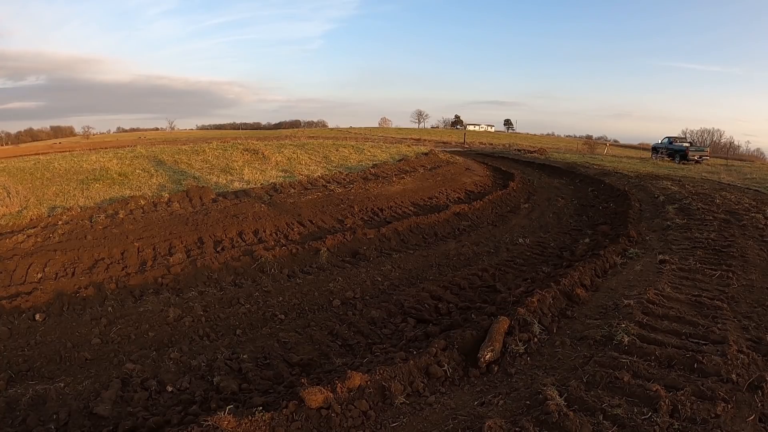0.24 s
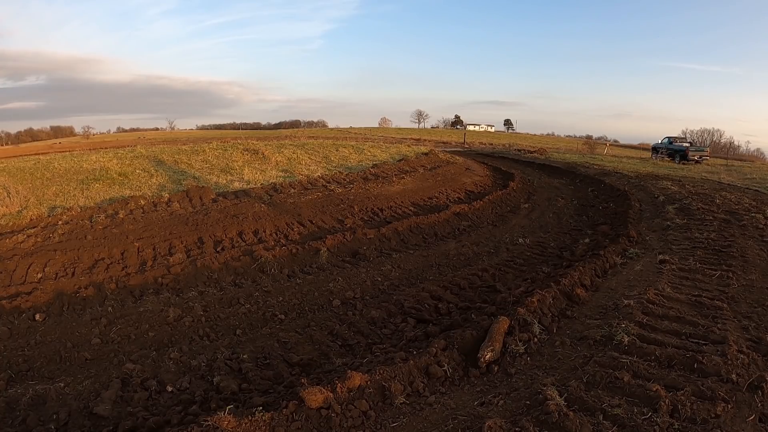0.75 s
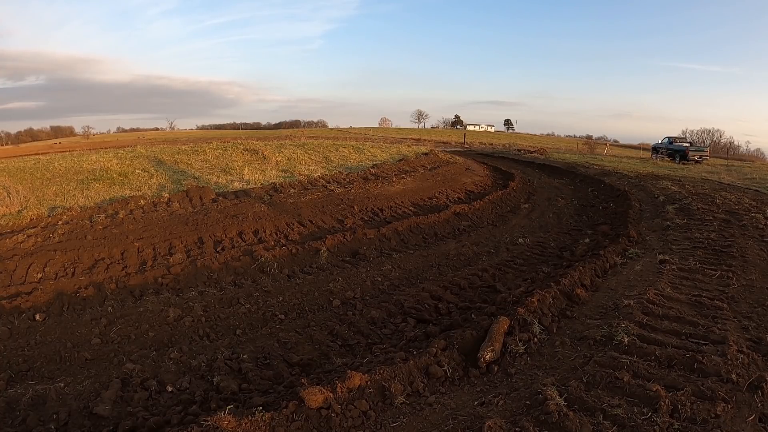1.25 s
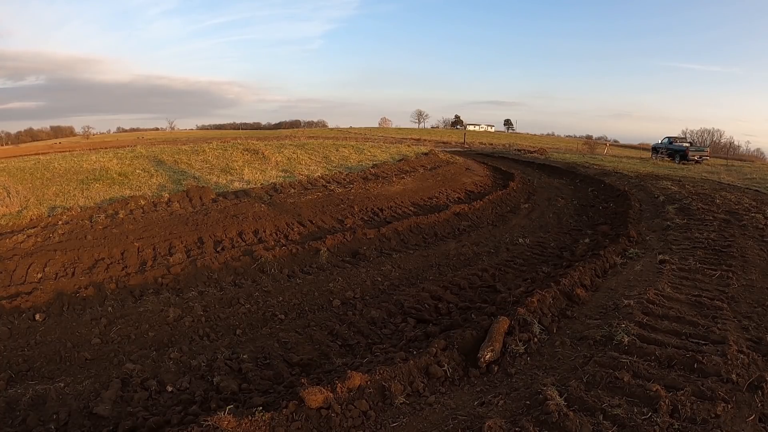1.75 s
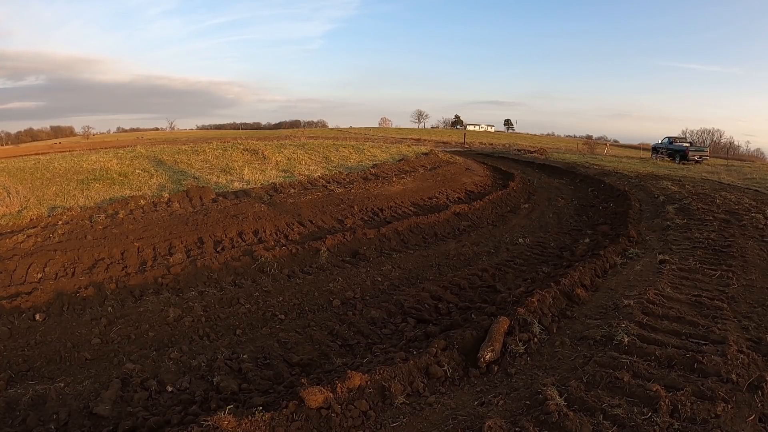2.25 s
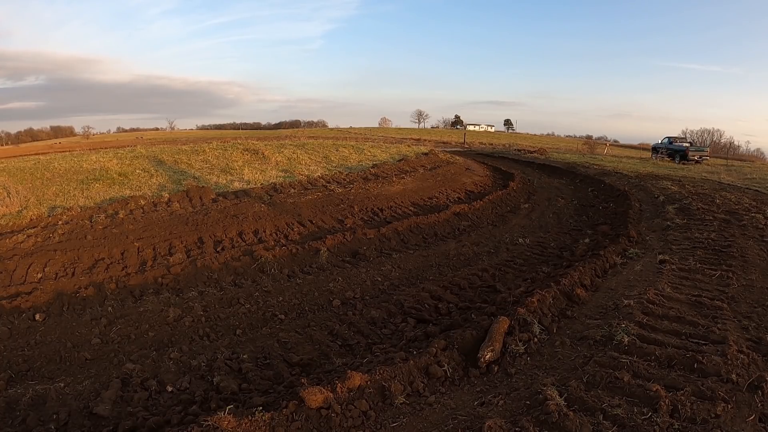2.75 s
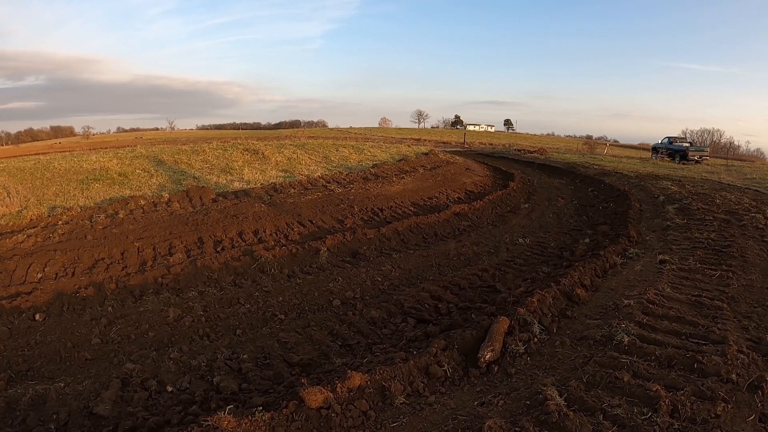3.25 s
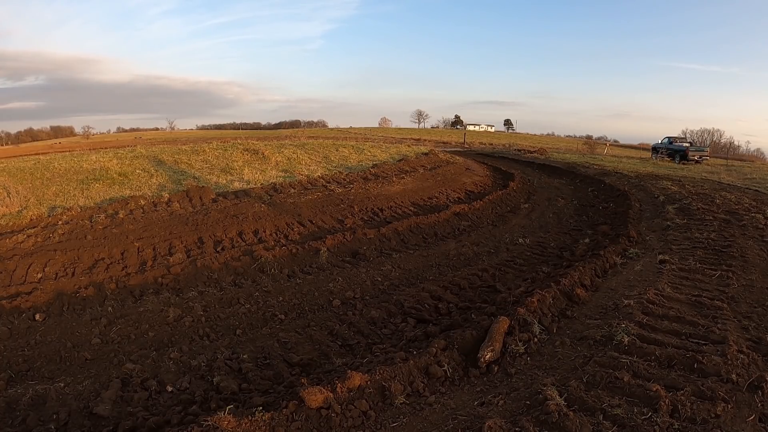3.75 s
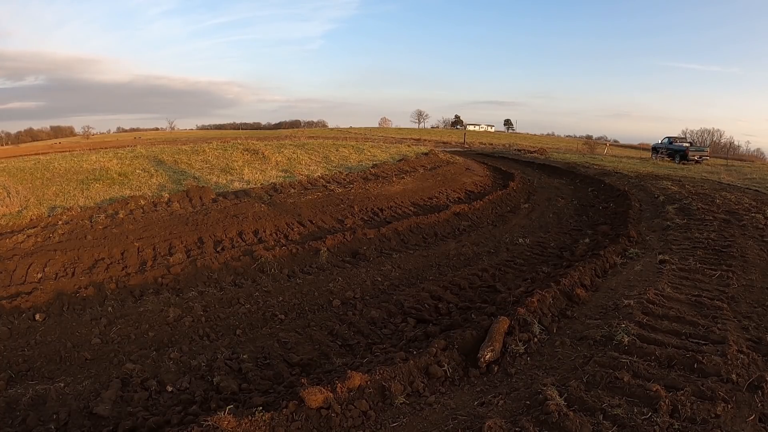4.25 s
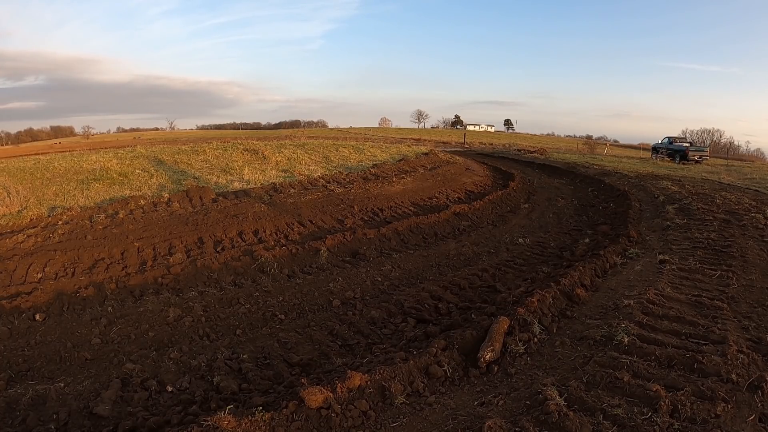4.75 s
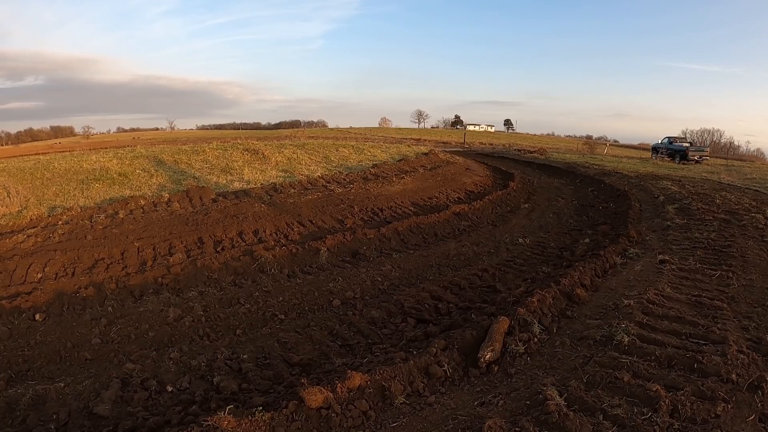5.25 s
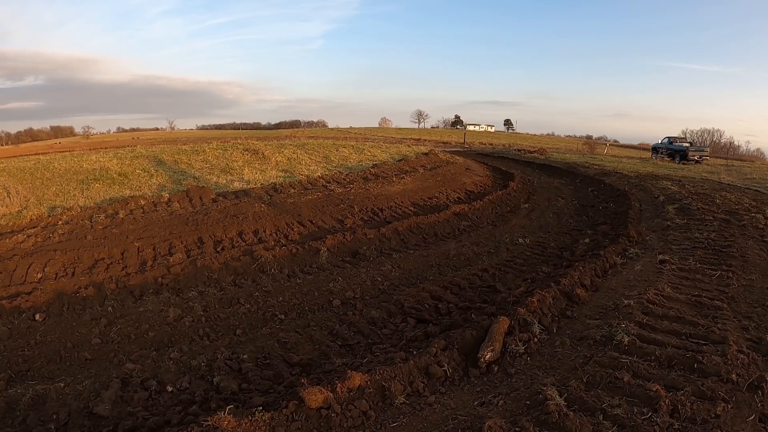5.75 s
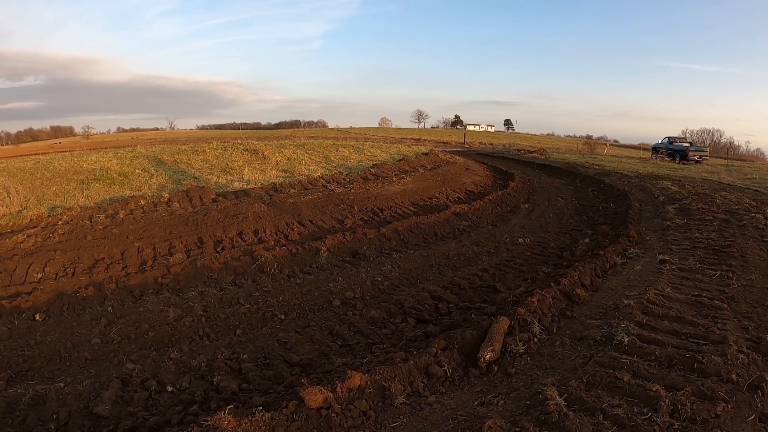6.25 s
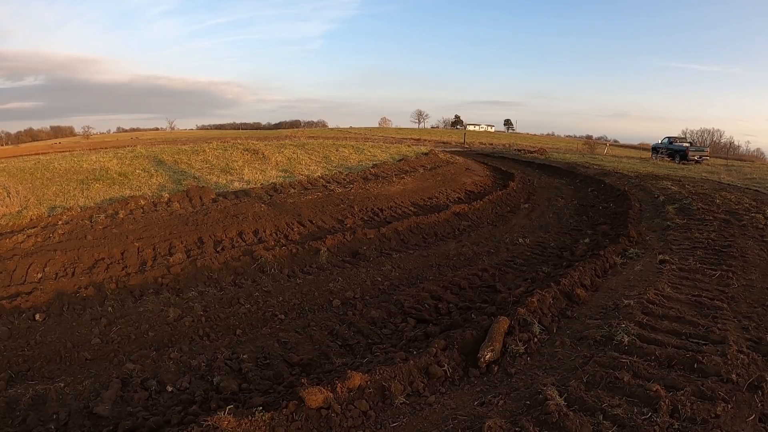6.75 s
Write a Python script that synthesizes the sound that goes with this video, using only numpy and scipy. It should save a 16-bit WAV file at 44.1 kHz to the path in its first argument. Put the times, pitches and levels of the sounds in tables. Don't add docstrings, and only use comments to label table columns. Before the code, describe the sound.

From 0 to 2.2 seconds a diesel crawler runs at steady working speed: a firm low exhaust drone, breathy fan and intake roar, a wavering gear whine, soil rumble, and constant link rattle with irregular steel plate clanks. A tiny high pin squeak passes at the start and faint ones near 1 second. At about 2.25 the throttle shuts; the note drops sharply in level and slides down by more than an octave until 3.3, clanks thinning to a few loose knocks. At 3.4 the engine bursts back and climbs through 4.2, dipping slightly, with almost no plate hits. From 4.2 clanks return, the whine rises, and from 5 to 7 the track clatter is denser, nearer and harder, with a brief squeak near 6.2. Open-air, dry stereo; highs favour the left, lows are shared. It ends still driving.

```python
import sys
import numpy as np
from scipy import signal
from scipy.fft import rfft, irfft, next_fast_len
from scipy.io import wavfile
from scipy.ndimage import uniform_filter1d

SR = 44100
rng = np.random.default_rng(int(sys.argv[2]) if len(sys.argv) > 2 else 0)


def master(y):
    cut = np.clip(np.atleast_2d(y).T, -1, 1)
    pcm = np.round(cut * 32767)
    wavfile.write(sys.argv[1], SR, pcm.astype(np.int16))


def level_to_linear(level):
    exponent = np.asarray(level, float) / 20
    return 10 ** exponent


N = 309141
SIZE = next_fast_len(N + 4096)
HZ = np.fft.rfftfreq(SIZE, 1 / SR)

# start_s, firing_hz, note_db
ENGINE = [(0.0, 110, -15.5), (0.85, 111.5, -17.5), (1.15, 108.3, -16), (1.6, 111.3, -18),
          (2.25, 107.5, -18), (2.275, 107.6, -29.5), (2.55, 83.35, -28.5), (2.75, 72.25, -27.5),
          (3.17, 50, -33), (3.33, 47.1, -31), (3.4, 54.6, -19), (3.5, 68.52, -16.5), (3.8, 84.15, -16.5),
          (4.18, 100.2, -16), (4.35, 97.5, -19.5), (5.1, 105.6, -18), (6.2, 110, -17.5),
          (7.01, 109.6, -18.5)]
# multiple_of_firing_rate, level_db
CRANK_ORDERS = [(.5, -28), (2 / 3, -34), (4 / 3, -26), (1.5, -25)]
# pitch_hz, level_against_note_db
STACK = [(96, 11), (112, -1.5), (135, -6), (148, -13), (166, -1.5), (182, -25), (205, -21), (222, -13)]
# start_s, gear_mesh_hz, track_work_db, nearness_db, intake_draw_db
TRAVEL = [(0, 968, -1, 4, 10), (.5, 998, -0.5, 1, 10), (1.1, 974, -1, 0, 4), (1.6, 1000, 0, -0.5, -8),
          (2.2, 1004, -1, -1.5, -6), (2.55, 900, -4, 0.5, -8), (3.3, 796, -6, 0.5, -28),
          (3.42, 798.4, -12, 3, 6), (3.55, 808.4, -8.5, -4, 3), (3.75, 831, -9.5, -0.5, 2),
          (4.2, 901, -4.5, 0.5, 3), (4.65, 1003, -1, -0.5, -15.5), (5.2, 1051, 0, 2, -10),
          (6.2, 1075, 0, 4, -1.5), (7.01, 1101, 0.5, 3.5, -6.5)]
# pitch_hz, level_db
ROAR = [(200, -15.5), (300, 4.5), (420, -4.5), (590, -6), (800, -4), (1250, -0.5), (1700, -12.5),
        (2500, -11.5), (3600, -12), (5000, -19.5), (6500, -22.5), (8000, -38), (10300, -53), (13000, -50.5)]
# start_s, peak_db, body_db, edge_db
PLATES_STOPPING = [(.066, -17.5, -7.5, -3), (.104, -20.5, -10, 1.5), (.209, -26, 0.5, -21),
                   (.249, -12.5, -17, -10.5), (.434, -22.5, 3, -33), (.546, -22.5, 1, -6.5),
                   (.632, -22, 1.5, -21), (.693, -18, -5.5, -19), (.719, -15.5, -10.5, -5.5),
                   (.741, -17.5, -4.5, -14), (.846, -23, 3.5, -5.5), (.902, -20.5, 2.2, -20.5),
                   (.956, -22, -1.5, -17), (1.009, -23.5, -4.5, -24), (1.13, -17.5, -10, -8.5),
                   (1.179, -24, 0.5, 0.5), (1.544, -28.5, 7, -11), (1.61, -22, 3, 0),
                   (1.725, -23.5, 2, -26), (1.772, -21.5, -1.5, -2), (1.86, -24.5, -5.5, -31),
                   (1.969, -27.5, 2.5, -22), (2.033, -31.5, 1.5, -20.5), (2.079, -21, -0.3, -26),
                   (2.311, -25, 5, -15), (2.346, -20, -4.5, -1.5), (2.42, -18.5, -3.5, -30),
                   (2.456, -20, -0.5, -9), (2.597, -14, -8, -19), (2.722, -19, 3, -8)]
# start_s, peak_db, body_db, edge_db
PLATES_AWAY = [(3.039, -26.5, 3.5, -16), (3.177, -27.5, 0, -27), (3.252, -23, -2.5, -27),
               (3.306, -19, -15.5, -12.5), (3.349, -29, -1, -15), (4.167, -19.5, -2.8, -22.5),
               (4.298, -20.5, -1.5, -16), (4.4, -19.5, 1, -29), (4.537, -19, -1.1, -14),
               (4.633, -18.5, 0, -11), (4.753, -16.5, -5.5, 1), (4.859, -17.5, -1.5, 3.5),
               (4.963, -20.5, 6.5, -32), (5.096, -15.5, -3, -4), (5.177, -13.5, -8, -3),
               (5.29, -29.5, -2.3, -23), (5.389, -13.5, -8.5, -6), (5.494, -12.5, -8, -8),
               (5.583, -27, 1.5, -20), (5.606, -25.5, 9, -12), (5.702, -18.5, 0, -16),
               (5.921, -17.5, -4, -18), (6.014, -13.5, -6, -0.5), (6.325, -26, -3.8, -22),
               (6.546, -18.5, -2.7, -33.5), (6.643, -12.5, -7.5, -14), (6.748, -13, -6, -19),
               (6.821, -21, -3, -15), (6.843, -13, -5.5, -10), (6.937, -13, -4, -13)]
# start_s, peak_db
PLATES_FAR = [(.013, -32), (.038, -28.5), (.181, -29), (.289, -26.5), (.328, -24.5), (.504, -30),
              (.523, -25.5), (1.075, -24.5), (1.148, -31.5), (1.3, -24.5), (1.408, -31), (1.524, -31),
              (1.628, -23.5), (1.659, -32.5), (2.183, -26.5), (2.848, -29), (2.885, -28.5), (4.5, -23),
              (5.022, -30.5), (5.27, -26.5), (5.477, -28), (5.81, -25), (6.04, -19.5), (6.137, -21),
              (6.23, -23), (6.359, -33), (6.446, -25.5), (6.626, -23.5)]
# pitch_hz, width_hz, level_db
TRACK_FRAME = [(587, 43, -6), (942, 79, 2.5), (1157, 280, 3), (2150, 170, -21.5), (3240, 620, -4.5),
               (590, 500, 5)]
# start_s, pitch_hz, level_db, width_s, glide_fraction
SQUEAKS = [
    (.047, 6090, -31, .009, 0),
    (1.005, 9940, -66, .018, -.004),
    (1.028, 9900, -56, .005, 0),
    (6.187, 9000, -50, .012, -.01),
]
# pitch_hz, level_db
SOIL = [(12, -53), (20, -15), (65, -5.5), (92, -3.5), (161, 2), (190, -9.5), (235, -9), (265, -19),
        (296, -12.5), (500, -46.5), (650, -65.5), (1100, -120)]
# pitch_hz, level_db
DISTANCE = [(250, -5.5), (420, -3.5), (560, -0.5), (4000, -8.5), (5000, -13.5), (6500, -15), (7200, -30.5),
            (8200, -28), (9500, -50), (10500, -45.5), (12500, -46), (14000, -55)]
# pitch_hz, level_db, phase_rad
SHADE = [(30, 0, -.03), (110, -.3, -.07), (300, -3, -.25), (600, -13, -.15), (730, -28, .5), (830, -17, 2),
         (1000, -23, 0), (1300, -24, 1), (1600, -36, 1), (1800, -18, 1.6), (2250, -35, 1.5),
         (2700, -12, 2.3), (3250, -15, 1.6), (3550, -32, 0), (4300, -8, -2.1), (5800, -13, -2.2),
         (8000, -6, -3.1), (9500, -8, -3.3), (12000, -1, -6)]
# pitch_hz, level_db
SCATTER = [(35, -9), (60, -36), (300, -34), (450, -17), (700, -23), (2000, -24), (4000, -19), (6500, -13),
           (9000, -2)]

GOVERNED_HZ = 110
STOPPING_RING_HZ, AWAY_RING_HZ = 1780, 2120


def unit(x):
    return x / np.sqrt(np.mean(x ** 2))


def curves(table):
    start_s, *columns = np.transpose(table)
    return [np.interp(np.arange(N) / SR, start_s, c) for c in columns]


def over_hz(table, axis=1):
    table = np.array(table)
    return np.interp(np.log(HZ + 1), np.log(table[:, 0]), table[:, axis])


def colour(x, gain):
    mirrored = np.pad(x, 2048, mode="reflect", reflect_type="odd")
    return irfft(rfft(mirrored, SIZE) * gain, SIZE)[2048:][:N]


def ring(x, hz, width_hz):
    return signal.lfilter(*signal.iirpeak(hz, hz / width_hz, SR), x)


def body(x, modes):
    return unit(sum(level_to_linear(db) * unit(ring(x, hz, width)) for hz, width, db in modes))


def walk(rate):
    hold = int(SR / rate)
    steps = np.repeat(rng.standard_normal(N // hold + 1), hold)
    return unit(uniform_filter1d(uniform_filter1d(steps, hold), hold)[:N])


def narrow(hz, width_hz):
    turn = 2 * np.pi * np.cumsum(hz + np.zeros(N)) / SR
    return unit(walk(width_hz) * np.cos(turn) + walk(width_hz) * np.sin(turn))


def exhaust(hz, note_db, second_db):
    turn = 2 * np.pi * np.cumsum(hz * (1 + 0.0061 * walk(30))) / SR
    note = level_to_linear(note_db + 0.16 * walk(30) + 0.33 * walk(90)) * np.sin(turn)
    smear = np.interp(note_db, [-26, -20], [2.5, .6])
    second = level_to_linear(second_db - 2.5 + walk(25)) * np.cos(2 * turn + smear * walk(13))
    crank = 0
    for multiple, db in CRANK_ORDERS:
        level = level_to_linear(db + note_db + 3.7 * walk(6.7))
        crank = crank + level * np.sin(multiple * turn + 1.5 * walk(6))
    return np.sqrt(2) * (note + second + crank), turn


def roar(turn, roar_db, low_db, high_db):
    air = rng.standard_normal(N) * (1 + 0.1 * np.sin(turn))
    wide = unit(colour(air, level_to_linear(over_hz(ROAR)))) * level_to_linear(roar_db + 3.5 + 0.94 * walk(13))
    low_whistle = level_to_linear(low_db) * narrow(2850 + 40 * walk(3.5), 360)
    high_whistle = level_to_linear(high_db) * narrow(4720 + 30 * walk(3.9), 480)
    return wide + low_whistle + high_whistle


def gears(hz, db):
    hz = hz * (1 + .006 * walk(10))
    tone = np.sin(2 * np.pi * np.cumsum(hz) / SR)
    smear = .8 * narrow(hz, 60)
    octave = level_to_linear(-11) * narrow(2 * hz, 90)
    return level_to_linear(db - 5 + 2 * walk(16)) * (tone + smear + octave)


def plate(ring_hz, body_db, edge_db, work_db):
    t = np.arange(4096) / SR
    noise, vary = rng.standard_normal((3, 4096)), rng.standard_normal(7)
    length_s = 0.013 * level_to_linear(-work_db + 1.2 * vary[6])
    fall = np.exp(-(t / np.clip(length_s, .003, .04)) ** 1.6) + .15 * np.exp(-t / .035)
    blow = noise * np.minimum(t / 0.0011, 1) * fall
    frame = ring(blow[0], 1000 * (1 + 0.072 * vary[0]), 220)
    frame += ring(blow[0], 1400 * (1 + 0.037 * vary[1]), 140)
    frame += 0.13 * ring(blow[0], 350, 248.6)
    own = ring(blow[1], ring_hz * (1 + 0.035 * vary[5]), 390)
    own += 0.17 * ring(blow[1], 2150 * (1 + 0.093 * vary[2]), 270)
    edge = ring(blow[2], 3550, 300)
    edge += 0.56 * ring(blow[2], 4400 * (1 + 0.012 * vary[3]), 260)
    edge += 0.67 * ring(blow[2], 5700 * (1 + 0.072 * vary[4]), 500)
    edge += 0.037 * ring(blow[2], 7000, 5000)
    crack = ring(noise[1] * np.exp(-t / .003), 2200, 3500)
    parts = [(frame, body_db + 1.0), (own, -7.5), (edge, edge_db + .5), (crack, -5)]
    return sum(p / np.abs(p).max() * level_to_linear(db + 1.5) for p, db in parts)


def clanks(work_db):
    out = np.zeros(N + 4096)
    far = [(start_s, db, -1, -13.5) for start_s, db in PLATES_FAR]
    groups = ((PLATES_STOPPING, STOPPING_RING_HZ), (PLATES_AWAY, AWAY_RING_HZ), (far, STOPPING_RING_HZ))
    for plates, ring_hz in groups:
        for start_s, peak_db, body_db, edge_db in plates:
            i = int(start_s * SR)
            out[i:i + 4096] += level_to_linear(peak_db) * plate(ring_hz, body_db, edge_db, work_db[i])
    return out[:N]


def rattle(rattle_db, bright_db):
    chance = rng.random((2, N))
    sizes = level_to_linear(np.minimum(-6 * np.log(chance[1] + 1e-9), 22))
    taps = (chance[0] < 700 * level_to_linear(3 * walk(22)) / SR) * sizes
    strength = np.sqrt(signal.lfilter([1], [1, -np.exp(-1 / (.002 * SR))], taps))
    scrape = strength * rng.standard_normal(N)
    edge = body(scrape, [(2120, 2400, 45), (3930, 7500, 8)])
    return level_to_linear(rattle_db + 2.0) * (body(scrape, TRACK_FRAME) + level_to_linear(bright_db - 14.5) * edge)


def squeaks():
    out = np.zeros(N)
    for start_s, hz, db, width_s, glide in SQUEAKS:
        t = np.arange(N) / SR - start_s
        swell = np.exp(-(t / width_s) ** 2)
        out += level_to_linear(db) * swell * np.sin(2 * np.pi * hz * t * (1 + glide * t / width_s / 4))
    return out


def pin_hiss(work_db):
    return level_to_linear(-55.5 + work_db) * narrow(3570, 450)


def rumble(ground_db, hull_db):
    soil = unit(colour(rng.standard_normal(N), level_to_linear(over_hz(SOIL)))) * level_to_linear(1.2 * walk(18))
    low = unit(ring(ring(rng.standard_normal(N), 171, 60), 155, 80)) * level_to_linear(1.2 * walk(14))
    hull = unit(ring(ring(rng.standard_normal(N), 238.3, 24), 233.0, 58)) * level_to_linear(2.0 * walk(12))
    return level_to_linear(ground_db) * (level_to_linear(2.5) * soil + level_to_linear(-5.5) * low) + level_to_linear(hull_db - 3) * hull


def echoes():
    taps = rng.standard_normal(600) * np.exp(-np.arange(600) / 200)
    return unit(rfft(taps, SIZE).view(float)).view(complex)


def two_ports(middle):
    shade = level_to_linear(over_hz(SHADE)) * np.exp(1j * over_hz(SHADE, axis=2))
    left = colour(middle, 2 / (1 + shade))
    scatter = level_to_linear(over_hz(SCATTER) - 8)
    scattered = sum(walk(40) * colour(left, scatter * echoes()) for _ in range(3))
    return np.array([left, colour(left, shade) + scattered])


def scene():
    hz, note_db = curves(ENGINE)
    mesh_hz, work_db, near_db, draw_db = curves(TRAVEL)
    octaves = np.log2(hz / GOVERNED_HZ)
    stack_hz, stack_db = np.transpose(STACK)
    passed_db = np.interp(np.log(2 * hz), np.log(stack_hz), stack_db)
    pipe, turn = exhaust(hz, note_db, note_db + passed_db + 2.3 * walk(5))

    fan_db = -43 + 6.5 * octaves + near_db
    low_whistle_db = -58 - 0.33 * work_db + 0.49 * np.clip(draw_db, -12, 3)
    air = roar(turn, fan_db, low_whistle_db, -61 + draw_db)
    whine = gears(mesh_hz, -38 + 3.5 * work_db + 2.5 * walk(3))

    links = rattle(-35 + work_db, 4 - 0.33 * work_db)
    steel = colour(clanks(work_db) + links, level_to_linear(over_hz(DISTANCE)))
    pins = squeaks() + pin_hiss(work_db)
    low = rumble(-26.5 + 0.6 * work_db, -25 + 0.66 * work_db + 14.5 * octaves)
    return two_ports(pipe + air + whine + steel + pins + low)


def roll_off(x):
    return signal.sosfilt(signal.butter(12, 14000, fs=SR, output="sos"), x)


def record(dry):
    mix = dry * np.minimum(np.arange(N)[::-1] / (.012 * SR), 1)
    return roll_off(mix)


dry = scene()
out = record(dry)
master(out)
```